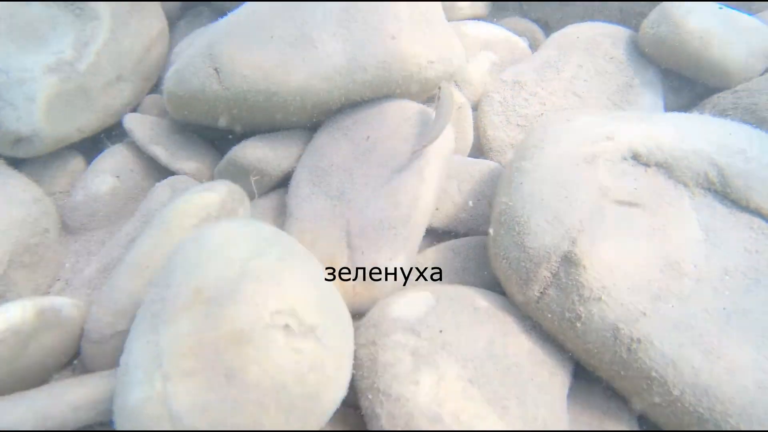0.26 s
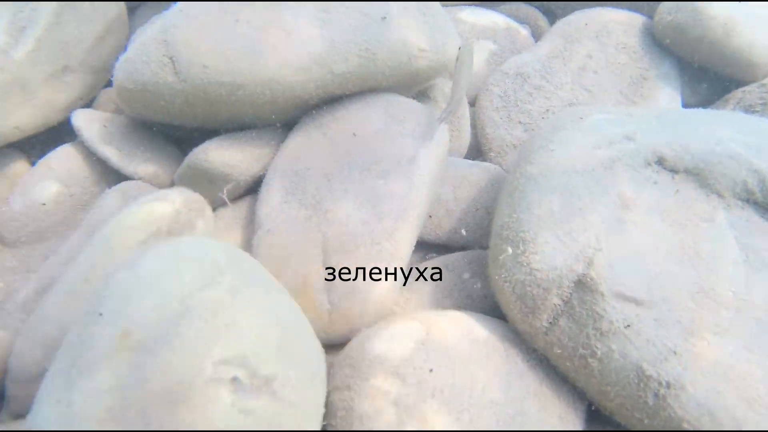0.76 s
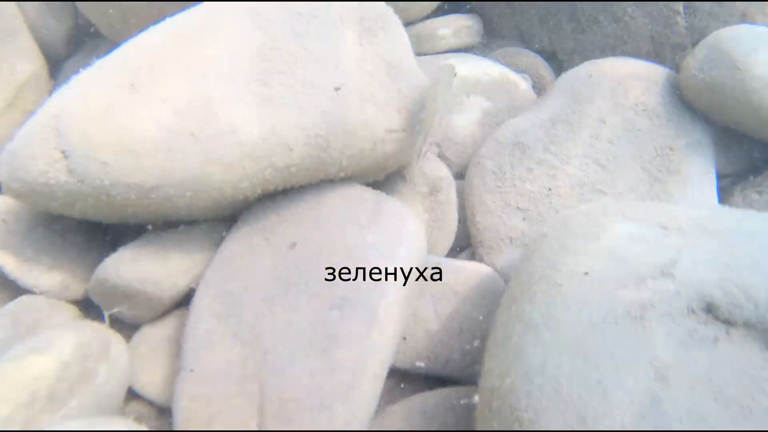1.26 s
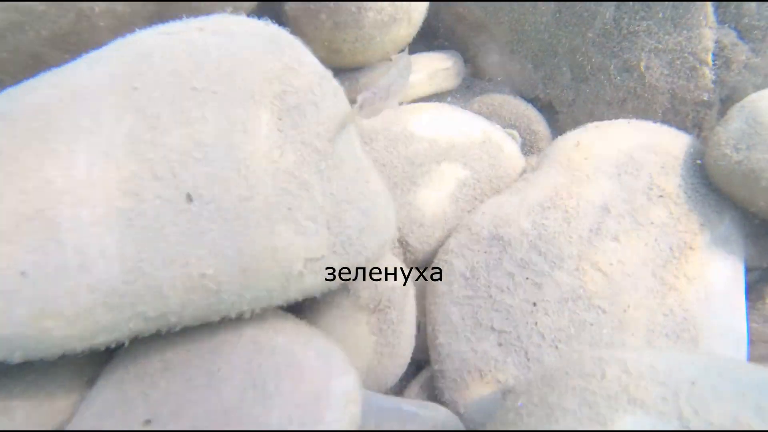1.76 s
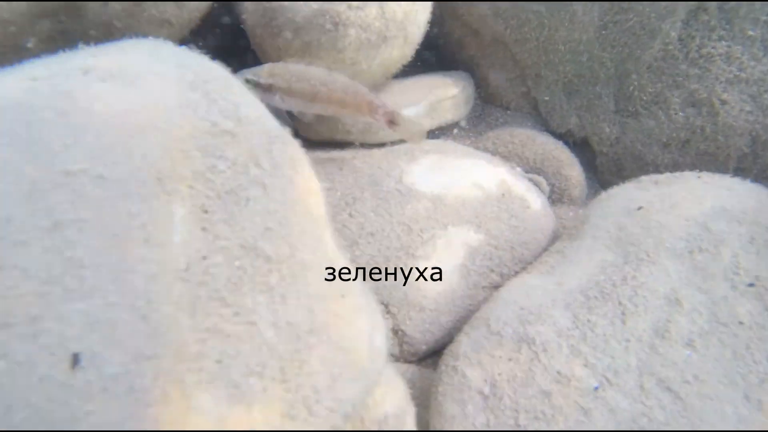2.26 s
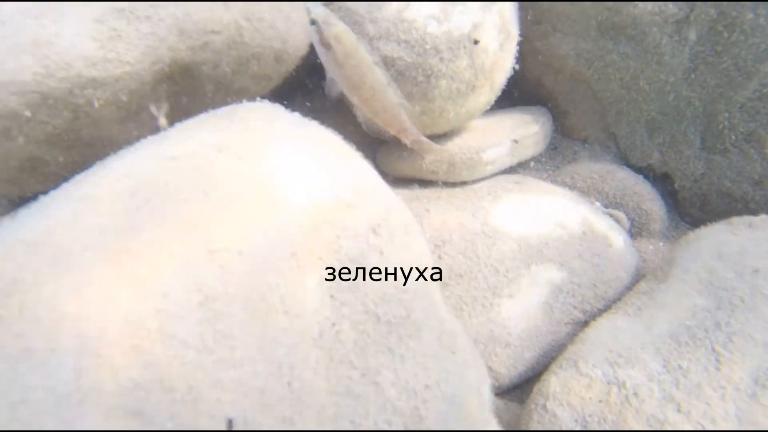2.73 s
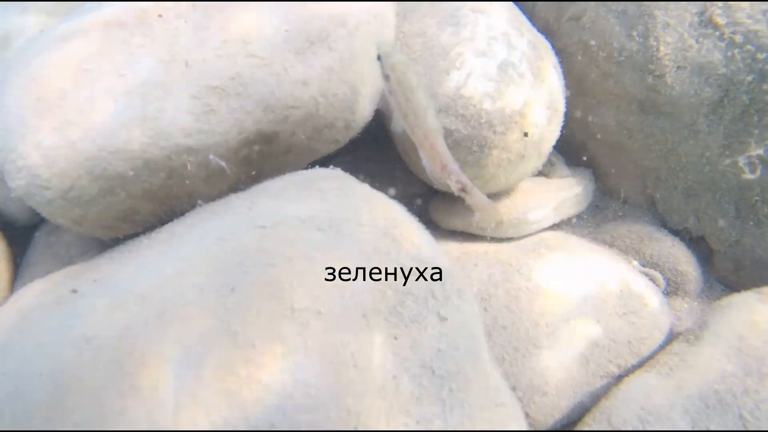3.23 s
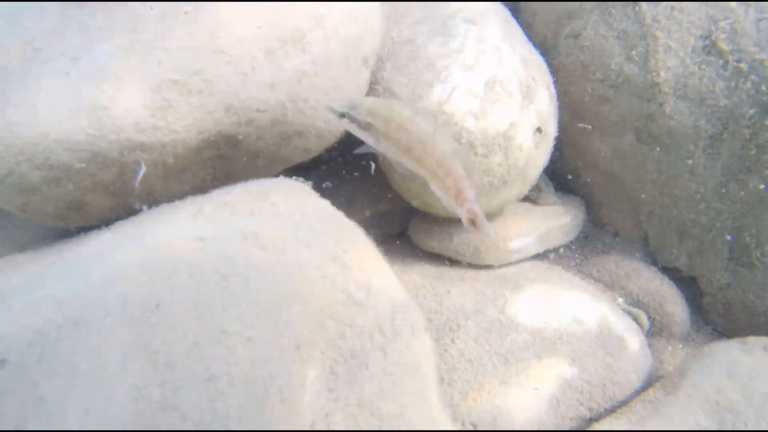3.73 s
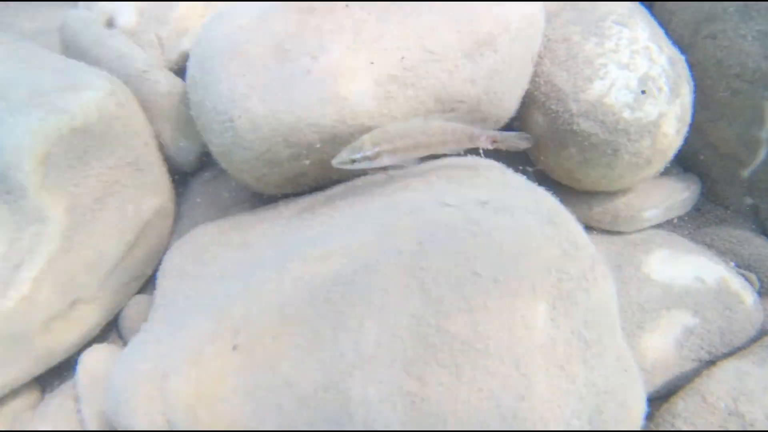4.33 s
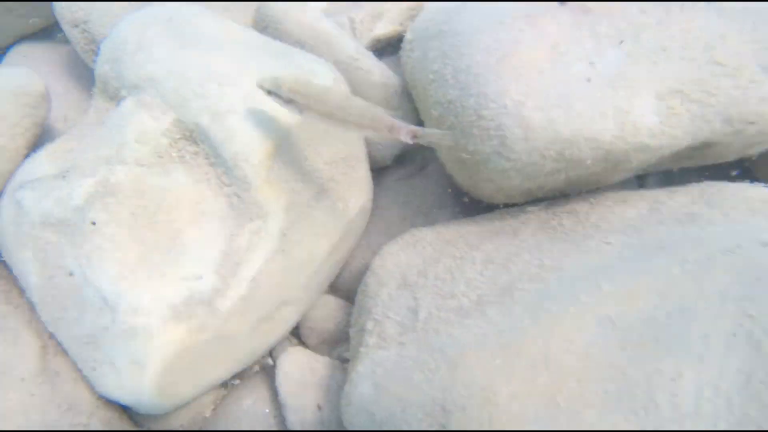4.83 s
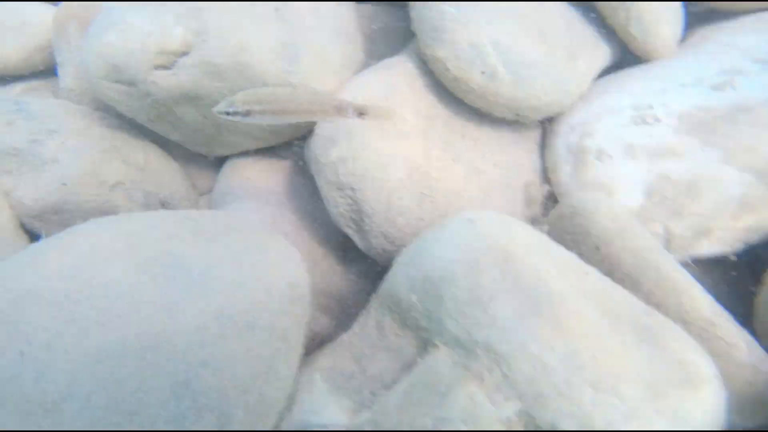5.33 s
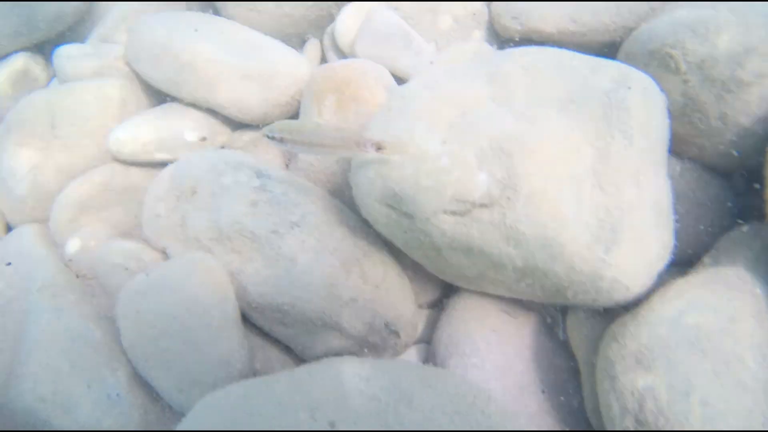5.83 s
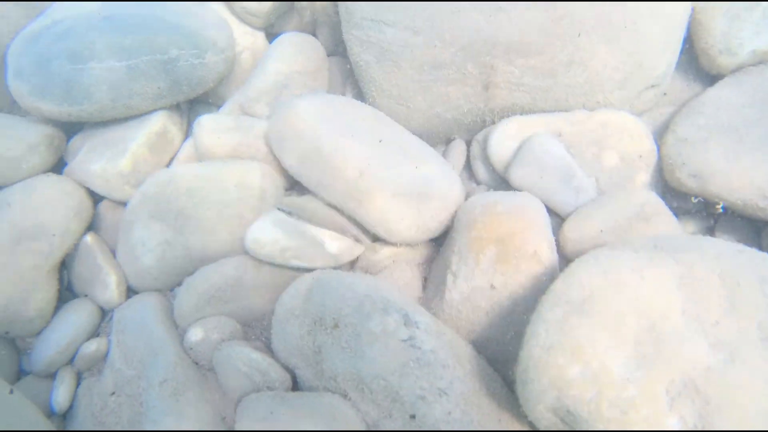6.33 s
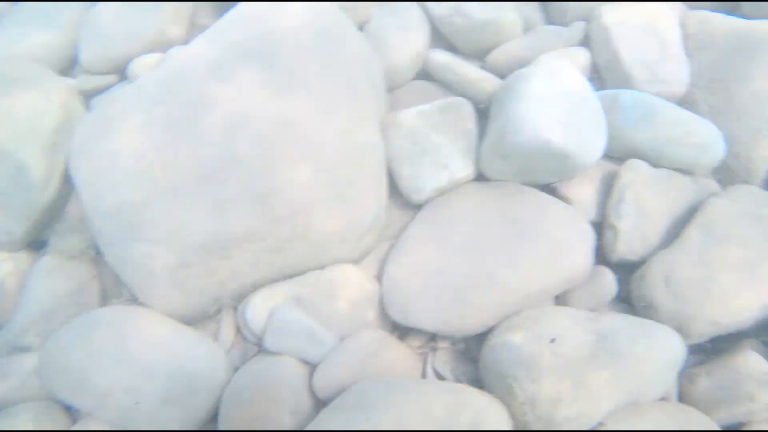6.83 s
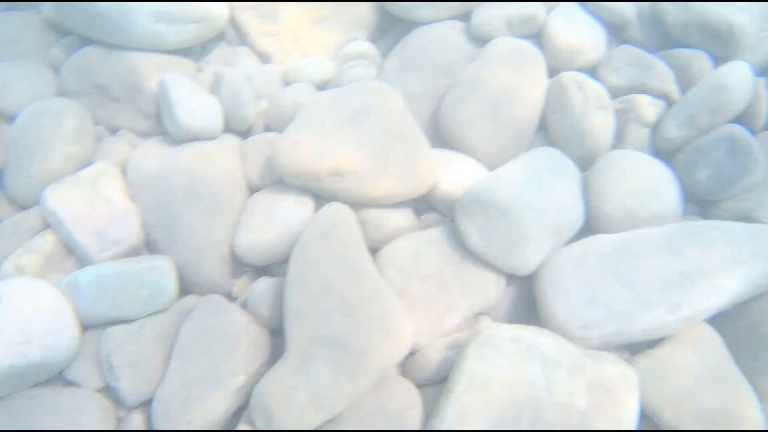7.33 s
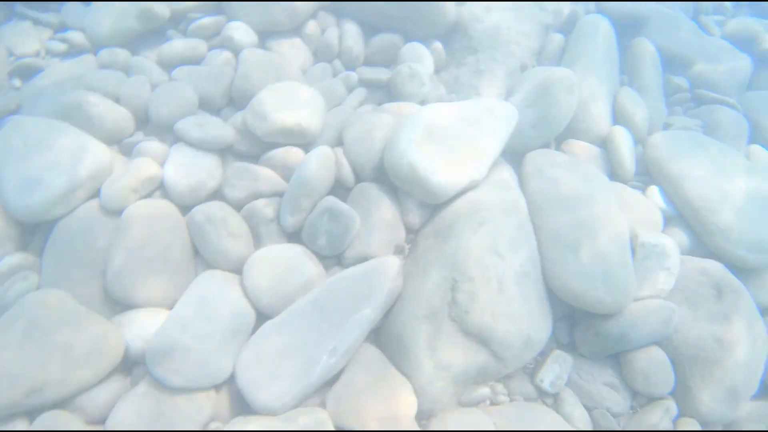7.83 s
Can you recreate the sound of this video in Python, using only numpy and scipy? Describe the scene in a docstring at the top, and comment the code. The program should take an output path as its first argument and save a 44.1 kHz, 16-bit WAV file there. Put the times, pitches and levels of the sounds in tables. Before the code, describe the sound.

The microphone is inside a small housing under shallow seawater, so everything is close, boxy and slightly ringing. From 0 to about 2.4 seconds, boomy bubbles slosh and glug in quick irregular succession, with high pips, an early pebble click and another wet slosh near 2. Gravel swells in a fizzing, ticking rush peaking around 2.55 over a low rumble, then drops, with a clear glug near 3.1. From 3.4 to 5.2 it is calm: faint bubbles, small surges of grit, soft low flutter, and light clicks to the left. At 5.36 a cluster of fuller glugs bursts out. Pebble ticks thicken from 5.6 and low water buffets press around 6.4. From 6.8 a stronger swell drags stones, with hard ringing knocks at 6.9 and 7.15, densest and loudest around 7.5 to 7.8, easing slightly but still rattling at the end, 8. A barely audible high whine persists.

```python
"""Shallow sea over a bed of pebbles, heard from inside a small waterproof camera held under the surface.
Sloshing is clouds of ringing bubbles, single glugs and sprinkles of tiny pips, the larger ones boomy.
Each surge drags gravel: bands of ticking noise fizz and rattle through the ringing shell, over a low rumble.
After a lull a stronger swell builds and pebbles knock as short rings with noisy cracks.
Eddies press on the housing as low noise and soft bumps, and a faint whine sits on top."""
import sys
import numpy as np
from scipy import signal
from scipy.fft import rfft, irfft
from scipy.io import wavfile
from scipy.ndimage import uniform_filter1d

SR = 44100
rng = np.random.default_rng(int(sys.argv[2]) if len(sys.argv) > 2 else 0)


def int16_out(signal):
    """Quantize to a 16-bit WAV file."""
    q = np.round(np.clip(np.atleast_2d(signal).T, -1, 1) * 32767)
    wavfile.write(sys.argv[1], SR, q.astype(np.int16))


N = 356328
TIME = np.arange(N) / SR

# Pan is left over right throughout. Levels marked "relative" get an offset from the function that uses them.
# sloshing surface: t/s, lapping relative level/dB, churning relative level/dB
SLOSH = [(0, -39.5, -59.5), (.5, -38, -47.5), (1.0, -38, -47), (1.38, -43.5, -62), (1.8, -45.5, -54),
         (1.98, -34, -42), (2.2, -37, -44.5), (2.38, -43, -56), (2.85, -56.5, -68.5), (3.35, -58.5, -69),
         (3.55, -66, -81), (3.75, -63.5, -70.5), (4.05, -67.5, -85), (4.5, -71.5, -81.5),
         (5.25, -67.5, -80), (5.85, -53.5, -75), (6.75, -52, -75), (7.25, -42, -58), (8.08, -49, -64)]
# single large air pockets: t/s, peak level/dB, f/Hz, t60/s
GLUGS = [(.034, -36.5, 443, 0.061), (.072, -33, 684, 0.14), (.092, -44.5, 330, 0.21),
         (.186, -29.5, 656, 0.029), (.19, -42, 313, 0.29), (.198, -35, 696, 0.028),
         (.2795, -18, 317, 0.023), (.377, -30.5, 710, 0.03), (.416, -24, 677, 0.022),
         (.474, -29, 224, 0.089), (.481, -29, 637, 0.026), (.585, -32.5, 603, 0.067),
         (.624, -32, 646, 0.055), (.655, -35.5, 330, 0.076), (.712, -34, 730, 0.042),
         (.751, -27, 600, 0.026), (.768, -26, 606, 0.083), (.855, -26, 673, 0.018), (.949, -21, 566, 0.033),
         (.951, -26, 317, 0.11), (1.0, -31.5, 640, 0.081), (1.048, -30.5, 310, 0.15),
         (1.158, -39, 824, 0.086), (1.188, -32.5, 798, 0.12), (1.22, -36.5, 326, 0.17),
         (1.252, -31, 557, 0.11), (1.389, -34.5, 508, 0.15), (1.463, -22.5, 560, 0.022),
         (1.465, -42.5, 376, 0.11), (1.469, -25.5, 772, 0.051), (1.58, -29, 618, 0.071),
         (1.572, -33.5, 364, 0.039), (1.698, -34, 605, 0.059), (1.722, -31.5, 514, 0.081),
         (1.845, -32, 558, 0.11), (1.937, -30, 650, 0.056), (2.012, -26.5, 650, 0.057),
         (2.074, -36, 646, 0.032), (2.02, -35, 234, 0.1), (2.112, -36.5, 300, 0.11),
         (2.115, -39, 193, 0.11), (2.12, -31, 866, 0.066), (2.222, -32, 660, 0.062),
         (2.242, -28, 651, 0.027), (2.866, -24, 550, 0.0085), (3.084, -20.5, 687, 0.12),
         (3.186, -40, 730, .024), (3.275, -42.5, 825, 0.064), (3.325, -42.5, 919, 0.083),
         (3.341, -39.5, 710, 0.048), (3.362, -50.5, 484, 0.14), (3.646, -41.5, 380, 0.057),
         (3.672, -43.5, 360, 0.13), (3.679, -44.5, 947, 0.066), (3.75, -42, 477, 0.065),
         (3.752, -45, 340, 0.09), (3.804, -50.5, 756, .03), (3.868, -54, 388, 0.26),
         (4.135, -46.5, 525, 0.28), (4.159, -33.5, 620, 0.021), (4.162, -40, 493, 0.15),
         (4.165, -40.5, 687, 0.073), (4.168, -47.5, 810, 0.085), (4.746, -40, 740, 0.099),
         (4.947, -43, 558, 0.078), (4.99, -49, 706, 0.26), (5.055, -46, 863, 0.06), (5.132, -54, 680, 0.03),
         (5.362, -21, 415, 0.044), (5.366, -25.5, 445.5, 0.18), (5.395, -33, 560, 0.0254),
         (5.406, -30, 464, .14), (5.428, -41, 715, 0.05), (5.439, -30, 523.5, 0.19),
         (5.457, -29, 736, 0.078), (5.468, -34, 757, 0.03), (5.484, -37, 634, 0.12), (5.625, -46, 704, .06),
         (5.74, -37.5, 780, 0.057), (5.828, -34, 614, 0.057), (5.86, -33.5, 704, 0.12),
         (5.882, -47, 934, 0.15), (5.917, -40, 752, 0.18), (5.935, -37.5, 495, 0.12),
         (5.958, -38, 680, 0.089), (6.03, -48.5, 466, 0.13), (6.081, -39, 706, 0.082),
         (6.113, -34, 706, 0.031), (6.225, -27, 513, 0.018), (6.2475, -27.5, 533, 0.015),
         (6.318, -36.5, 566, 0.016), (6.338, -26.5, 620, 0.012), (6.41, -41.5, 715, 0.13),
         (7.003, -33.5, 529, 0.22), (7.148, -35.5, 655, .08), (7.257, -27.5, 697, 0.039),
         (7.295, -43, 335, 0.15), (7.306, -26.5, 657, 0.025), (7.455, -41.5, 320, 0.15)]
# bursts of tiny bubbles close by: t/s, relative peak level/dB, f/Hz, pan/dB
PIPS = [(.075, -55, 1940, -1), (.336, -51, 1540, -4), (0.41, -50, 1190, -1), (0.475, -50.5, 1360, 1),
        (0.546, -54, 1920, -2), (.755, -77, 1940, -10), (.795, -55, 1610, -8), (0.864, -58, 1770, -6),
        (0.897, -61, 2280, -2), (0.917, -58, 4070, 2), (1.013, -54, 1930, -12), (1.09, -54, 1480, -4),
        (1.2, -56.5, 3940, 0), (1.231, -48.5, 4020, 2), (1.306, -56.5, 3920, 3), (1.304, -56.5, 2050, -2),
        (1.409, -60, 3600, -7), (1.438, -57, 3860, 2), (1.497, -49, 3730, 6), (1.545, -58.5, 3360, 1),
        (1.575, -52, 1584, -1), (1.637, -55, 1710, -4), (1.744, -52.5, 3580, 0), (2.976, -47, 4840, 10),
        (3.0, -51, 3760, 9), (3.186, -57, 1590, 0), (3.28, -53, 4960, 15), (3.322, -45, 4600, 8),
        (4.25, -51.5, 3860, 19), (4.302, -48, 3290, 20), (4.355, -60, 3000, 22), (4.589, -58, 1460, 3),
        (4.685, -65, 1380, 12), (5.349, -51, 1650, 8), (5.995, -56, 1440, 6)]
# swells rolling the bed: crest t/s, relative strength/dB, rise/(dB/s), fall/(dB/s) (negative keeps growing),
# treble loss/dB, heavy-stone boost/dB; each size of stone takes its own share of the last four
SWELLS = [(0, -24, 20, 67, 3.5, 4), (0.459, -23, 69, 41, 8.5, -0.5), (2.551, -7.5, 31.5, 33.5, 17, 1),
          (3.35, -20.5, 49, 31, 41, -15), (4.26, -24, 150, 93, 22, 1), (4.75, -23.5, 400, 16, 15, 4),
          (5.25, -22, 35, -3, 6, -0.5), (5.85, -17.5, 20, 44, 5.5, 2), (6.25, -15.5, 20, -9, 7, -28),
          (7.048, -9, 26.5, 5.5, -8.5, 5.5), (7.8, -2, 16, 23, 0, -2.5)]
# the bed as the camera drifts over it: t/s, far gravel hiss relative level/dB, pan/dB
BED = [(0, -75, 15), (1.1, -70, 11.5), (1.75, -63, 14), (2.6, -70, 18.5), (3.4, -62.5, 17.5),
       (4.0, -66, 22), (4.5, -63, 25), (5.15, -79, 27.5), (5.95, -71, 23), (6.85, -47.5, 18),
       (8.08, -110, 18.5)]
# pebbles knocking: t/s, relative peak level/dB, ring f/Hz, pan/dB, crack over ring level/dB
CLACKS = [(0.2762, -43.5, 3500, 5, 9), (.286, -32.5, 1820, -1, 13), (2.105, -49.5, 3440, 7, -12),
          (2.1983, -43.5, 2250, 2, -17), (2.304, -42, 2290, 6, -7), (2.342, -43.5, 2180, 14, -17),
          (2.429, -43.5, 1820, 0, -19), (2.452, -39, 2010, -3, -11), (2.491, -58, 3400, 4, -8),
          (2.5613, -41, 4970, 4, -15), (2.606, -34, 5560, 8, -22), (2.648, -45, 1890, -8, -12),
          (2.68, -39.5, 3930, 8, -14), (2.729, -42, 3840, 8, -18), (2.783, -45, 3800, 6, -12),
          (2.8795, -53, 1890, 8, 0), (2.919, -46, 5700, 8, -12), (2.963, -48, 1670, 3, -13),
          (4.6375, -46.5, 2160, 15, 3), (4.658, -53, 2180, 17, -3), (4.8252, -50.5, 2210, 20, -8),
          (4.946, -53, 3320, 20, -1), (5.069, -51, 3420, 22, -6), (5.101, -45.5, 2120, 16, -5),
          (5.146, -51, 2240, 19, -4), (5.177, -51, 2320, 20, 0), (5.2038, -50.5, 2380, 24, -11),
          (5.3304, -47, 3120, 20, -16), (5.295, -46.5, 2340, 27, -9), (5.358, -36.5, 4100, 5.5, -6),
          (5.4403, -49.5, 2300, 8, -8), (5.585, -47.5, 2200, 18, 4), (5.6568, -54, 2290, 14, -10),
          (5.672, -51, 2100, 16, -8), (5.734, -44.5, 2200, 8, 4), (5.7649, -41.5, 2400, 7, -10),
          (5.8599, -58, 3180, 11, -5), (5.88, -38, 2000, 3, -3.5), (5.957, -52, 3400, 12, -3),
          (5.987, -43, 3370, 14, -6), (6.0615, -47, 2230, 12, -12), (6.123, -42.5, 2600, 19, -3),
          (6.163, -46, 3340, 17, 5), (6.233, -53, 3420, 17, -10), (6.256, -44, 3500, 9, -11),
          (6.2777, -41, 3930, 12, -7), (6.2997, -38.5, 4420, 10, -3), (6.336, -43.5, 1320, 6, -6),
          (6.35, -44.5, 4200, 10, -7), (6.4974, -33.5, 4030, 15, -8.5), (6.543, -43, 4280, 7, -13),
          (6.5889, -35.5, 3870, 6, -1), (6.7076, -35.5, 4700, 5, -7), (6.7645, -44, 3450, 0, 2),
          (6.826, -41, 4650, 2, -21), (6.847, -42, 4200, 11, -6), (6.871, -37.5, 1880, 4, 1),
          (6.9024, -24, 1750, -0.5, -2), (6.9303, -39, 1750, -3, -16), (6.94, -32.5, 1690, 0, -6),
          (6.999, -32.5, 1660, 1, -19), (7.0644, -31, 1650, -2, -4), (7.1436, -24, 7500, 7, -6),
          (7.151, -31.5, 2200, 5, 19), (7.172, -35, 1770, 3, -21), (7.186, -30, 4220, 5, -18),
          (7.307, -26.5, 2080, 6, -5.5), (7.5148, -32, 2170, 6, -6), (7.538, -23.5, 4370, 5, 5),
          (7.5542, -19, 1550, 4, -11), (7.5785, -19.3, 1910, 6.5, 3), (7.7541, -27, 2140, 7, -2.5),
          (7.8157, -25.5, 2120, 7, 3), (7.8332, -23.5, 3330, 11, -8), (8.0001, -29.5, 2130, 7, 1),
          (8.023, -33.5, 3830, 6, -8), (8.0491, -34, 3490, 14, -14), (8.0593, -22.5, 1760, -4.5, -10)]
# eddies pushing on the housing: t/s, flutter level/dB
EDDIES = [(.31, -60), (.55, -58), (0.929, -57), (1.24, -62.5), (1.63, -52.5), (1.8, -53.5), (2.0, -75),
          (2.31, -63), (2.87, -61), (3.0, -61), (3.56, -64), (3.69, -57), (3.76, -66), (3.92, -71),
          (4.07, -62), (4.36, -59), (4.56, -57), (5.04, -76), (5.531, -55), (6.08, -50.5), (6.14, -54.5),
          (6.44, -46), (6.57, -48), (6.72, -52.5), (6.86, -62), (7.07, -53.5), (7.39, -57), (7.558, -50.5),
          (7.87, -56)]
# soft bumps of water on the housing: t/s, peak level/dB, starting f/Hz, t60/s
BUMPS = [(0.288, -50, 36.3, 0.28), (1.622, -37, 147, 0.0057), (2.865, -46.5, 240, 0.047),
         (5.362, -44, 265, 0.039), (6.388, -40.5, 180, 0.0059), (6.437, -42.5, 338, 0.032),
         (6.503, -39, 410, 0.029), (6.568, -34, 116, 0.027), (7.065, -30, 216, 0.085),
         (7.862, -50, 222, 0.021)]
# colour of the eddies' flutter: f/Hz, level/dB
EDDY_COLOUR = [(12, -31), (35, 10.5), (60, 5), (100, 1.5), (160, -6), (300, -14), (800, -35), (3000, -85)]
# boom of the housing: f/Hz, level/dB
BOOM = [(80, -28.5), (200, -30.5), (330, -16), (450, -3), (560, -2), (660, 7), (780, -1.5), (900, -9),
        (1100, -8), (1600, -28.5), (2600, -49.5), (5000, -68)]
# colour of the shell at the left microphone: f/Hz, level/dB
SHELL_LEFT = [(600, -18.5), (1100, -23.5), (1400, -5.5), (1950, -17), (2220, 4), (2700, -5.5), (3200, -2.5),
              (4400, -8.5), (5500, -7), (7500, -11.5), (9000, -18), (10300, -15.5), (12500, -30.5),
              (15500, -47)]
# colour of the shell at the right microphone: f/Hz, level/dB
SHELL_RIGHT = [(600, -28.5), (1100, -9.5), (1500, -3), (1900, 7.5), (2250, -10.5), (2750, -2), (3900, 1),
               (6000, -14), (7700, -13), (8500, -21), (10000, -28.5), (13000, -31), (15500, -54)]
# ringing of the shell: f/Hz, left relative level/dB, right relative level/dB, t60/s
SHELL_MODES = [(1594, -6, -12, 0.08), (1711, -7, -10, 0.09), (1916, -2, -12, 0.09), (2196, 1, 4.5, 0.06),
               (3453, -3, -20, 0.06), (3896, -5, -12, 0.05), (4089, -5, -17, 0.07), (4370, -5, -20, 0.1),
               (4501, -5, -15, 0.09), (6088, -20, 0, 0.07), (9180, -54, -6.5, 0.008)]

BOOM_PAN_DB, LAG_S = -2.1, .00018
CREST_S = 0.11   # a swell holds its strength this long either side of the crest
CLACK_T60_S = 0.0056
CALM_DB = -76.5   # the flutter between eddies
EDDY_ATTACK_S, EDDY_RELEASE_S = 0.012, 0.028   # time constants
PIP_CYCLES, PIP_SPREAD_OCTAVES_PER_KHZ = 42, .03
SMALL_SWELL_CYCLES = 1.2   # onset of small bubbles
WHINE_HZ, WHINE_DB, CUTOFF_HZ = 15217, -81.5, 15900


def slosh(middle_db=-3.5, large_db=-3.0, small_db=-18.0, spray_db=-22.0, small_growth=0.7):
    """Larger bubbles and glugs boom through the housing; small bubbles gush above them."""
    boom = response(BOOM)
    lapping, churning = in_time(SLOSH)
    # small bubbles follow the churning with a narrower range of level
    tearing = churning.max() + small_growth * (churning - churning.max())
    gushes = np.sqrt(clumps(clump_db=4.5, clump_s=.035))

    middling = bubble_cloud(484.3, 950.0, per_s=170, cycles=58.0, spread_db=15.5, rise=0.21, swell_cycles=0.34)
    large = bubble_cloud(173.0, 396.4, per_s=150, cycles=49.0, spread_db=23)
    small = bubble_cloud(937, 1450, per_s=230, cycles=50, spread_db=19, rise=0.08,
                         swell_cycles=SMALL_SWELL_CYCLES)
    spray = bubble_cloud(1400, 2300, per_s=260, cycles=55, spread_db=19, rise=0.05,
                         swell_cycles=SMALL_SWELL_CYCLES)
    clouds = [(through(middling, boom), lapping + middle_db),
              (through(large, boom), churning + large_db),
              (scattered(small * gushes, scatter_db=3, t60=0.044), tearing + small_db),
              (scattered(spray * gushes, scatter_db=3.5, t60=.07), tearing + spray_db)]
    out = sum(from_db(level) * evened(cloud, span_s=0.17) for cloud, level in clouds)
    for s, peak_db, hz, t60 in GLUGS:
        add(out, s, through(glug(hz, t60), boom), peak_db)
    return panned(out, BOOM_PAN_DB)


def bubble_cloud(low_hz, high_hz, per_s, cycles, spread_db, rise=0.25, swell_cycles=0.09):
    """Bubbles are born at random; each rings at the pitch of its size, climbing as it nears the surface."""
    lead = SR // 4   # the cloud is already going when the scene opens
    out = np.zeros(lead + N)
    for when, size, life, force in rng.random((int(per_s * len(out) / SR), 4)):
        hz = low_hz * (high_hz / low_hz) ** size
        t60 = cycles * 2 ** (2 * life - 1) / hz   # from half to twice the usual life
        add(out, when * len(out) / SR, ring(hz, t60, rise, swell_cycles), spread_db * force)
    return out[lead:]


def glug(hz, t60, climb_per_s=1.5, shed_db=-18, shed_share=0.41, spread_octaves=0.32, swell_cycles=0.31,
         count=4, size=16384):
    """An air pocket climbs in pitch as it rises, and early on sheds weaker, briefer bubbles near its size."""
    out, rise = np.zeros(size), climb_per_s * t60
    add(out, 0, ring(hz, t60, rise, swell_cycles), 0)
    for late, pitch in rng.random((count, 2)):
        shed_hz = hz * 2 ** (spread_octaves * (2 * pitch - 1))
        add(out, late * shed_share * t60, ring(shed_hz, t60 / 2, rise / 2, swell_cycles), shed_db)
    return scattered(out, scatter_db=-13, t60=.13)


def ring(hz, t60, rise=0, swell_cycles=0.26):
    """A dying sine with a soft onset, its pitch climbing by the share rise over t60."""
    t = np.arange(int((t60 + .02) * SR)) / SR
    swell = 1 - np.exp(-t * hz / swell_cycles)
    tone = np.sin(2 * np.pi * hz * t * (1 + rise * t / t60 / 2))
    return swell * tone * from_db(-60 * t / t60)


def pips(burst_s=.014, fade_db=9, level_db=1.0, count=8, size=4096):
    """A torn air pocket sheds tiny bubbles, the first loudest; smaller ones are briefer and more varied."""
    out = np.zeros((2, N))
    for s, peak_db, hz, pan_db in PIPS:
        burst = np.zeros(size)
        spread_octaves = PIP_SPREAD_OCTAVES_PER_KHZ * hz / 1000
        for late in np.append(0, rng.random(count - 1)):
            note_hz = hz * 2 ** (spread_octaves * rng.standard_normal())
            note = ring(note_hz, PIP_CYCLES / note_hz, rise=0.023, swell_cycles=SMALL_SWELL_CYCLES)
            add(burst, late * burst_s, note, -fade_db * late)
        burst = scattered(burst, scatter_db=-3, t60=.075)
        add(out, s, panned(lagged(burst), pan_db), peak_db + level_db)
    return out


def shingle(shell, shell_pan_db=10.0):
    """The surge rolls six sizes of stone: finer ones tick higher, and each answers the swells its own way."""
    cobbles = grains(
        1060, 1754, rolled(level_db=-46.5, growth=1.39, dulled=0.27, heavy=1.0, inertia=1.36, settling=0.59),
        far_db=-18, per_s=85, spread_db=6.0, wash_db=7.5, own=0.61, shell=shell, count=1)
    pebbles = grains(
        1603, 2746, rolled(level_db=-43.5, growth=1.063, dulled=0.06, heavy=0.54, inertia=0.94, settling=1.02),
        far_db=-15, per_s=130, spread_db=3.5, wash_db=-1.5, own=1.0, shell=shell, count=2)
    coarse = grains(
        2700, 4480, rolled(level_db=-41.5, growth=1.263, dulled=0, settling=0.88),
        far_db=-14.0, per_s=170, spread_db=6.5, wash_db=3.5, own=0.65, shell=shell, count=2)
    fine = grains(
        4485, 7660, rolled(level_db=-44.5, growth=1.282, dulled=0.0, settling=0.62),
        far_db=-5.5, per_s=470, spread_db=4.5, wash_db=1.0, own=2.5, shell=shell, count=2)
    sand = grains(
        7170, 11500, rolled(level_db=-51.5, growth=0.75, dulled=1.0),
        far_db=-14.5, per_s=360, spread_db=7.0, wash_db=3.5, own=3.7, shell=shell, count=2)
    grit = grains(
        12000, 16500, rolled(level_db=-56.0, growth=1.18, dulled=1.0),
        far_db=-28, per_s=680, spread_db=5.5, wash_db=-3.5, own=4.2, shell=shell, count=1)
    bed = cobbles + pebbles + coarse + fine + sand + grit
    sideways = in_time(BED)[1] - shell_pan_db   # the shell already favours the left; drift about that
    same_power = np.sqrt(np.cosh(sideways * np.log(10) / 20))   # panning leaves the loudness alone
    return panned(bed, sideways) / same_power


def grains(low_hz, high_hz, near, far_db, per_s, spread_db, wash_db, own, shell, count):
    """Near stones tick in clumps over the smooth hiss of far ones; ticks span the band or only a part of it."""
    gain = np.hypot(near, from_db(in_time(BED)[0] + far_db))
    near_share = (near / gain) ** 2
    wash = from_db(wash_db) ** 2   # steady power under the ticks
    broad, stones = tick_power(per_s, spread_db), 0
    edges = np.geomspace(low_hz, high_hz, count + 1)
    for low, high in zip(edges, edges[1:]):
        ticks = (broad + tick_power(per_s, spread_db)) / 2
        rattle = clumps() * (ticks + wash) / (1 + wash)
        # one noise common to both microphones, plus each one's own
        noise = rng.standard_normal(N) + own * rng.standard_normal((2, N))
        noise = np.sqrt(near_share * rattle + 1 - near_share) * noise
        band = signal.butter(5, [low, high], "band", fs=SR, output="sos")
        stones = stones + signal.sosfilt(band, noise)
    heard = np.array([through(side, wall) for side, wall in zip(stones, shell)])
    return gain * evened(heard, span_s=0.23)


def rolled(level_db, growth, dulled, heavy=0, inertia=1, settling=1, size=1600):
    """Gain of one stone size: grows with the swells, takes shares of their treble loss and heaviness, settles."""
    power, t = 0, np.linspace(0, TIME[-1], size)
    for crest_s, db, rise, fall, loss_db, coarse_db in SWELLS:
        before = np.maximum(crest_s - CREST_S - t, 0)
        after = np.maximum(t - crest_s - CREST_S, 0)
        swell_db = db - inertia * rise * before - settling * fall * after   # more inertia starts later
        power = power + from_db(swell_db - dulled * loss_db + heavy * coarse_db) ** 2
    return np.interp(TIME, t, from_db(level_db) * np.sqrt(power) ** growth)


def tick_power(per_s, spread_db, size=2048):
    """Power of randomly timed contacts of uneven force, each with a scattered tail; mean 1."""
    force_db = spread_db * np.minimum(rng.exponential(1, N), 4)
    sizes = from_db(force_db) * (rng.random(N) < per_s / SR)
    t = np.arange(size) / SR
    contact_s, scatter_db, scatter_t60 = .0008, -12, .04
    shape = np.exp(-t / contact_s) + from_db(scatter_db - 60 * t / scatter_t60) ** 2
    power = np.abs(through(sizes ** 2, shape))
    return power / power.mean()


def clumps(clump_db=2.5, clump_s=.03, size=1024):
    """Stones and bubbles set their neighbours off, so they come in short clumps: a gain on their power."""
    wander = np.interp(TIME / clump_s, np.arange(size), rng.standard_normal(size))
    return from_db(clump_db * wander) ** 2


def clacks(shell, tail_hz=4000, own=1.0, level_db=5.5, size=4096):
    """Stone hits stone: a crack, thinner for smaller stones, a brief ring and a duller scattered tail."""
    out, t = np.zeros((2, N)), np.arange(size) / SR
    crack_t60, scatter_db, scatter_t60 = .014, -15, .11
    dull = signal.butter(2, tail_hz, fs=SR, output="sos")
    for s, peak_db, hz, pan_db, crack_db in CLACKS + loose_pebbles():
        direct, echoes = rng.standard_normal((2, 1, size)) + own * rng.standard_normal((2, 2, size))
        tone = np.sin(2 * np.pi * hz * t) * from_db(-60 * t / CLACK_T60_S)
        tail = signal.sosfilt(dull, echoes) * from_db(scatter_db - 60 * t / scatter_t60)
        crack = from_db(crack_db) * (direct * from_db(-60 * t / crack_t60) + tail)
        crack = signal.sosfilt(signal.butter(2, hz / 2, "high", fs=SR, output="sos"), crack)
        hit = np.array([through(tone + side, wall) for side, wall in zip(crack, shell)])
        balanced = hit / hit.std(axis=1, keepdims=True)
        add(out, s, panned(balanced, pan_db), peak_db + level_db)
    return out


def loose_pebbles(per_s=11, top_db=-32.5, spread_db=10, low_hz=2200, high_hz=5600, crack_db=-4.0):
    """Lesser knocks at random, harder in a stronger swell and blunter in a duller one; rows as in CLACKS."""
    force = 20 * np.log10(rolled(level_db=top_db, growth=1.31, dulled=0))
    bright = 20 * np.log10(rolled(level_db=top_db, growth=1.31, dulled=1))
    pan_db, rows = in_time(BED)[1], []
    for when, weak, size in rng.random((int(per_s * N / SR), 3)):
        i = int(when * N)
        hz = low_hz * (high_hz / low_hz) ** size
        sharpness_db = crack_db + bright[i] - force[i]
        rows.append((i / SR, force[i] - spread_db * weak, hz, pan_db[i], sharpness_db))
    return rows


def rumble(level_db=-43.5, ring_hz=660, width_hz=130, wash=0.94):
    """The rolling bed sets the housing booming: an even wash, and a throb with each heavier contact."""
    contacts = np.sqrt(wash + tick_power(per_s=45, spread_db=3.5)) * rng.standard_normal(N)
    ringing = signal.lfilter(*signal.iirpeak(ring_hz, ring_hz / width_hz, fs=SR), contacts)
    booming = evened(through(ringing, response(BOOM)), span_s=.25)
    return panned(rolled(level_db=level_db, growth=1.0, dulled=0) * booming, BOOM_PAN_DB)


def eddies(soft_hz=500, sag=0.49, swell_cycles=0.51):
    """Moving water presses on the housing: a low flutter and a few soft bumps that sag in pitch."""
    colour = response(EDDY_COLOUR, size=8192)
    pressure = rng.standard_normal(N) + .3 * rng.standard_normal((2, N))
    flutter = np.array([through(side, colour) for side in pressure])
    out = eddy_push() * evened(flutter, span_s=0.41)
    soft = signal.butter(4, soft_hz, fs=SR, output="sos")
    for s, peak_db, hz, t60 in BUMPS:
        add(out, s, signal.sosfilt(soft, ring(hz, t60, -sag, swell_cycles)), peak_db)
    return panned(out, pan_db=-3.0)


def eddy_push(size=8000):
    """Each eddy presses quickly and lets go more slowly."""
    t = np.linspace(0, TIME[-1], size)
    pushes = 0
    for s, db in EDDIES:
        away = np.maximum((s - t) / EDDY_ATTACK_S, (t - s) / EDDY_RELEASE_S)
        pushes = pushes + from_db(db) * np.exp(-away)
    return from_db(CALM_DB) + np.interp(TIME, t, pushes)


def shell_response(modes_db=-2.5):
    """The shell at both microphones: a broad colour plus its ringing modes."""
    out = np.array([response(SHELL_LEFT), response(SHELL_RIGHT)])
    t = np.arange(out.shape[1]) / SR
    for hz, left_db, right_db, t60 in SHELL_MODES:
        fade = from_db(-60 * t / t60)
        mode = 2 * fade / fade.sum() * np.cos(2 * np.pi * hz * t)   # about unit gain at its pitch
        out += from_db(np.array([[left_db], [right_db]]) + modes_db) * mode
    return lagged(out)


def lagged(x):
    """High sounds cross the shell and reach the right microphone a little after the left."""
    left, right = np.broadcast_to(x, (2, x.shape[-1]))
    late = np.pad(right, (round(LAG_S * SR), 0))[:len(right)]
    return np.array([left, late])


def scattered(sound, scatter_db, t60, size=4096):
    """Reflections between stones and surface add a short, uneven tail."""
    t = np.arange(size) / SR
    tail = rng.standard_normal(size) * from_db(-60 * t / t60)
    return through(sound, (t == 0) + from_db(scatter_db) * tail / np.linalg.norm(tail))


def response(points, size=2048):
    """Causal (minimum-phase) impulse response of a spectrum, by folding its cepstrum."""
    hz, db = np.transpose(points)
    grid = np.maximum(np.fft.rfftfreq(size, 1 / SR), 1)
    gain = from_db(np.interp(np.log(grid), np.log(hz), db))
    cepstrum = irfft(np.log(gain))
    cepstrum[1:size // 2] *= 2
    cepstrum[size // 2 + 1:] = 0
    return irfft(np.exp(rfft(cepstrum)))


def through(x, impulse):
    """Pass a sound through an impulse response."""
    return signal.oaconvolve(x, impulse)[:len(x)]


def evened(x, span_s):
    """Take out slow changes of level, keep the grain."""
    power = uniform_filter1d(middle(x) ** 2, max(int(span_s * SR), 1))
    return x / np.sqrt(np.abs(power) + 1e-4 * power.mean())


def panned(x, pan_db):
    """Left louder than right by pan_db."""
    return x * from_db(np.array([[1], [-1]]) * pan_db / 2)


def add(out, s, sound, peak_db):
    """Mix a sound in at a time and peak level of its channel mean."""
    i = int(s * SR)
    scaled = sound * from_db(peak_db) / np.abs(middle(sound)).max()
    out[..., i:i + sound.shape[-1]] += scaled[..., :out.shape[-1] - i]


def middle(x):
    """The mean of the channels."""
    return np.atleast_2d(x).mean(axis=0)


def in_time(rows):
    """Each column of a curve at every sample."""
    s, *columns = np.transpose(rows)
    return [np.interp(TIME, s, c) for c in columns]


def from_db(db):
    """Decibels to gain."""
    return 10 ** (np.asarray(db) / 20)


def scene():
    """Sloshing above, stones below, eddies on the housing."""
    shell = shell_response()
    return slosh() + pips() + shingle(shell) + rumble() + clacks(shell) + eddies()


def record(dry):
    """The camera's electronics add a faint whine; the top is cut."""
    whine = from_db(WHINE_DB) * np.sin(2 * np.pi * WHINE_HZ * TIME)
    top_cut = signal.ellip(10, .1, 70, CUTOFF_HZ, fs=SR, output="sos")
    return signal.sosfilt(top_cut, dry + whine)


dry = scene()
out = record(dry)
int16_out(out)
```